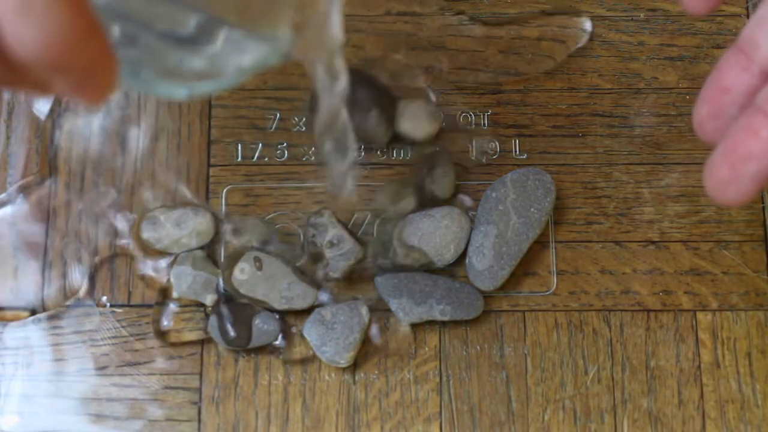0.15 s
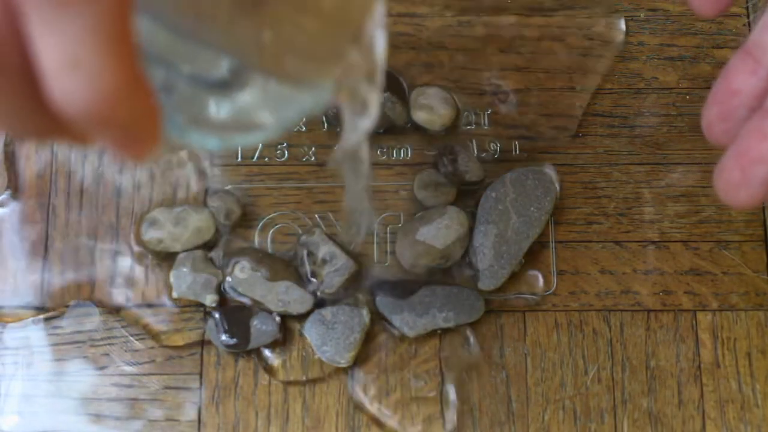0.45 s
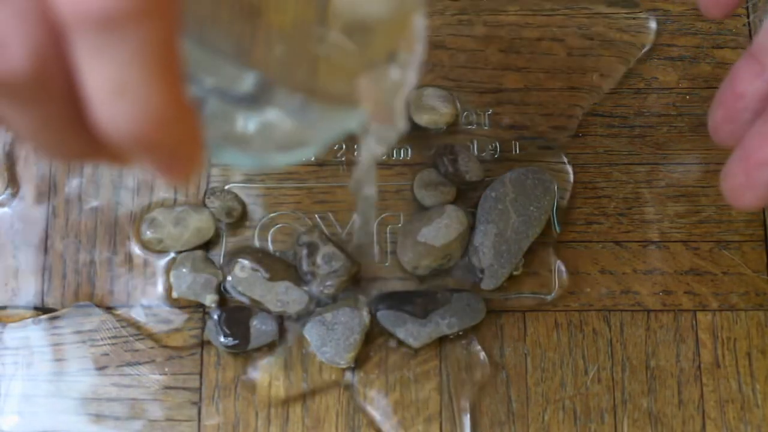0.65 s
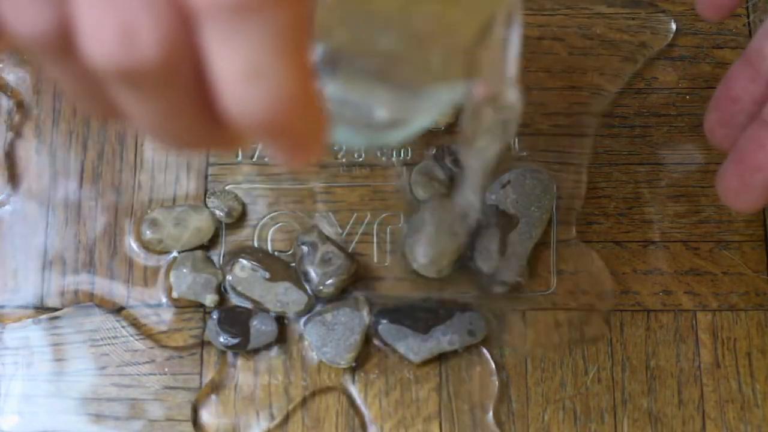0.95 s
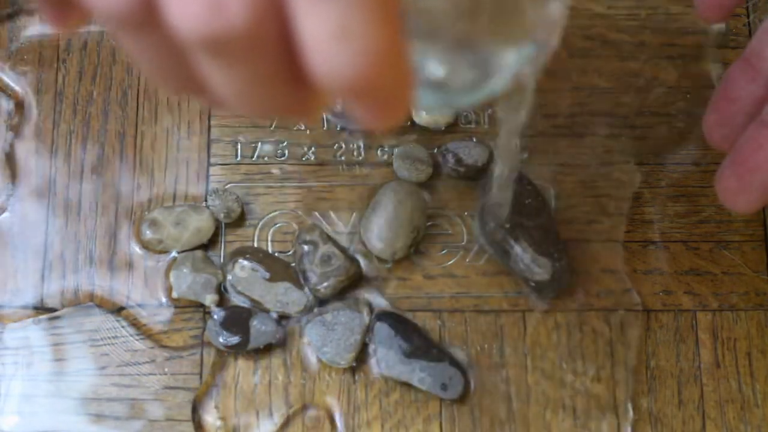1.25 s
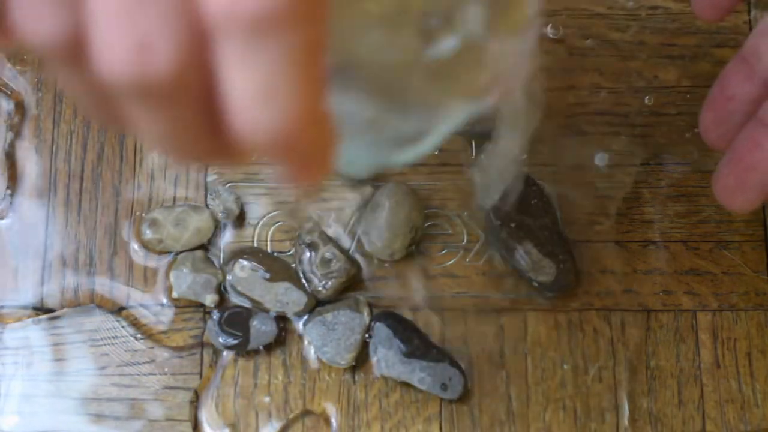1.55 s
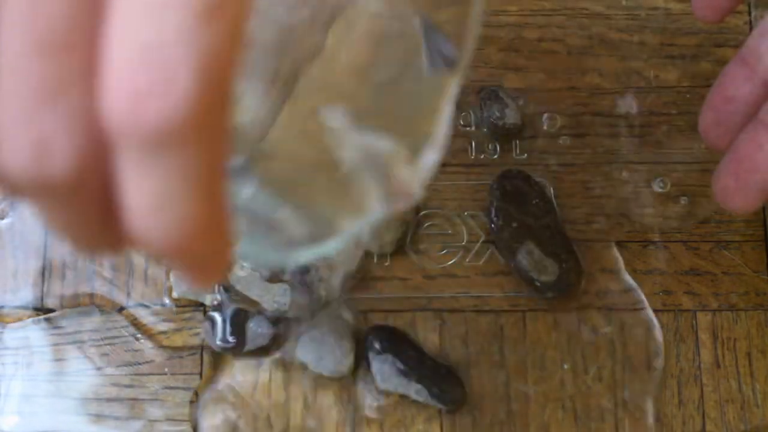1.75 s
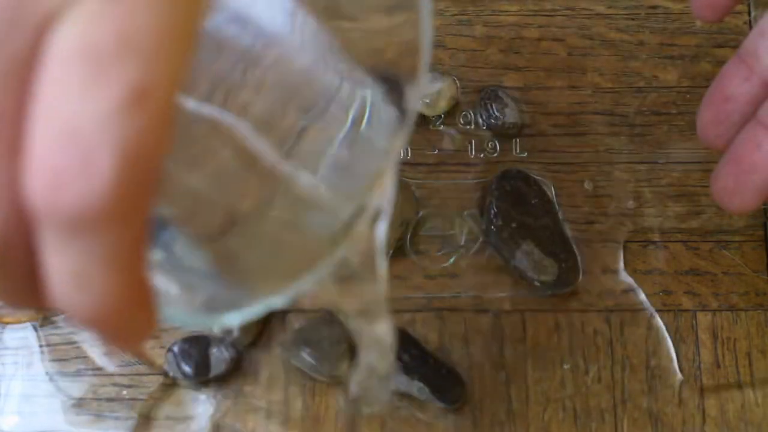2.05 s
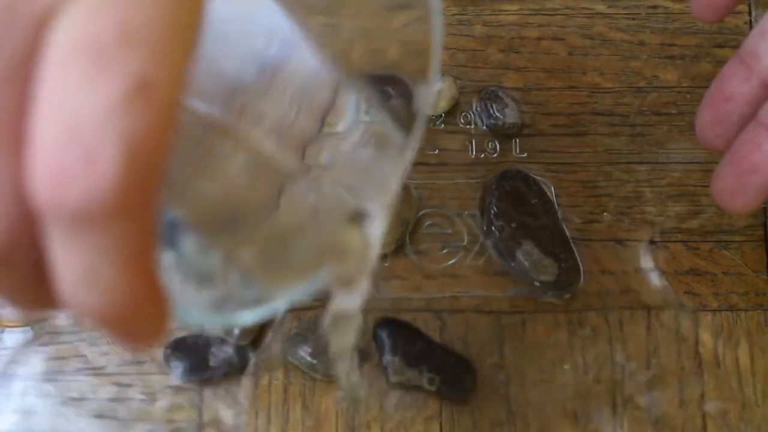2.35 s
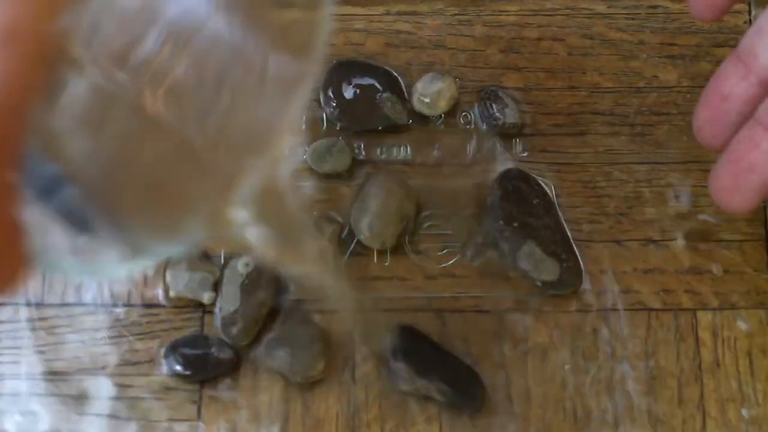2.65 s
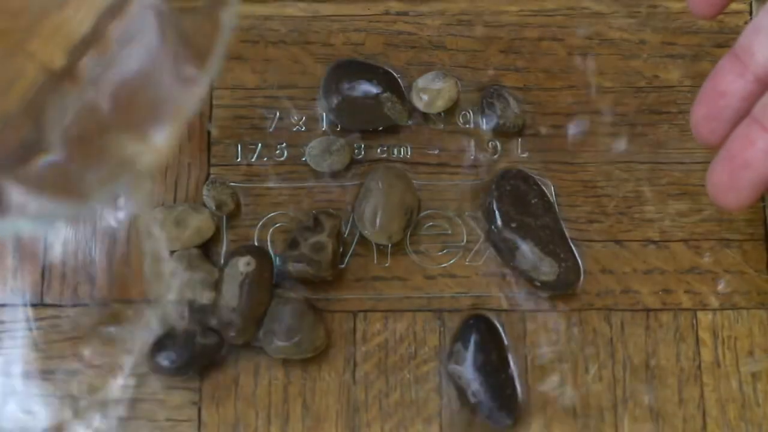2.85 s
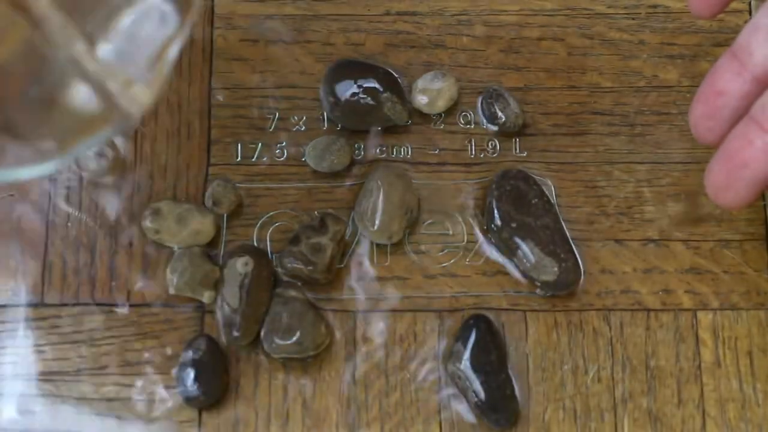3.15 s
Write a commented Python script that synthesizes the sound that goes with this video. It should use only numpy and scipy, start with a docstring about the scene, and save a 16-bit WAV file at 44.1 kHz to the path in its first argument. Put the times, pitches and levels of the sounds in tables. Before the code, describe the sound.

Water pours from a glass onto pebbles in a glass dish, pattering, spitting and bubbling close by. The pebbles roll, knock and scrape against the dish throughout, and a few drips end the pour in a quiet room.

```python
"""Water patters onto pebbles in a glass dish, poured from a glass close by; the dish is on a wooden floor.
The stream spits and traps bubbles; it rolls the pebbles, which knock, scrape and ring the dish.
A few drips end the pour, over a quiet room with a faint far motor."""
import sys
import numpy as np
from scipy import signal
from scipy.fft import rfft, irfft
from scipy.io import wavfile
from scipy.ndimage import uniform_filter1d, map_coordinates

SR = 44100
rng = np.random.default_rng(int(sys.argv[2]) if len(sys.argv) > 2 else 0)


def dump(signal):
    """Clip the signal to [-1, 1] and save it as 16-bit WAV at the path in sys.argv[1]."""
    limited = np.clip(np.atleast_2d(signal).T, -1, 1)
    pcm = np.round(limited * 32767).astype(np.int16)
    wavfile.write(sys.argv[1], SR, pcm)


N = 145530
T = np.arange(N) / SR
RING_T = T[:SR // 5]
TOP_HZ = 15750

# Flow of the stream. Each row: time in seconds, relative level in dB.
STREAM_FLOW = [(0, -50.5), (.2, -37.5), (.5, -38.5), (.62, -41.5), (.9, -47), (1.04, -46), (1.3, -47),
               (1.45, -48.5), (1.75, -35.5), (1.85, -41.5), (2.35, -46.5), (2.6, -42.5), (2.85, -42),
               (3.0, -43), (3.15, -68.5)]
# Spectrum of water on stones. Each row: frequency in Hz, relative gain in dB.
WASH_SPECTRUM = [(60, -29), (160, -14), (270, 13.5), (450, -13.5), (720, 2), (1300, 5), (2100, -1),
                 (3800, 2.5), (5500, -10.5), (9000, -10), (16000, -11)]
def stream(patter_db=3, wash_db=-2.5):
    """Falling water drums softly on the dish and washes over the stones."""
    flow = undb(curve(STREAM_FLOW))
    drops = impacts(per_s=1500, spread_db=4.5) * flow
    ring = np.zeros(N)
    for place in range(len(PLACE_STARTS_S)):
        response = dish(place, tilt_db_per_oct=-8.5, scatter_db=3)
        ring += through(drops * (place_at(T) == place), response)
    wash = unit(colour(impacts(per_s=2500, spread_db=8), WASH_SPECTRUM)) * flow
    return undb(patter_db) * waver(ring) + undb(wash_db) * wash


# Modes of the wet glass dish. Each row: frequency in Hz, t60 in seconds, then relative strength in dB
# when struck at the back, right, front, left.
DISH_MODES = [(705, 0.057, -18, -19, -19.5, -30), (801, 0.039, -16.5, -17.5, -22, -26),
              (1088.7, 0.11, -9.5, -12.5, -12.5, -16), (1882, 0.049, -3.5, 1, -0.5, -12),
              (2181, 0.029, -1, -8, -7, -13), (2911, 0.071, -7.5, -1, -8.5, 0.5),
              (3090, 0.076, -9, -2.5, 0, -24), (3158, 0.065, -4, 3, 2, -16), (3427, 0.026, -4, -5, -5, 4),
              (3893, 0.13, -8, -12.5, -29, -16), (4463, 0.077, -28, -22.5, 0, -18),
              (4604, 0.052, 1, 4.5, -3, 1.5), (4813, 0.078, -1.5, -0.5, -10.5, -1),
              (4946, 0.085, -3, 0.5, -9, -17), (5090, 0.055, 6.5, 0.5, -10, -15),
              (5530, 0.062, -23, -23, -8, 2.5), (5756, 0.12, -6.5, -3.5, -10, -8),
              (6100, 0.084, -3.5, -12, -15, -11), (6590, 0.084, -7, 1, -10.5, -3.5),
              (6750, 0.093, -13, -21, -9.5, -3), (7070, 0.043, -13, 1, -10.5, -22),
              (7250, 0.079, -12.5, -13, -13.5, -14), (7660, 0.1, -24, -5, -16, -2),
              (8114, 0.057, -6.5, 3, -12, 5), (9100, .04, -14, -3, -24, -5),
              (9500, 0.091, -30, -11, -14, -9), (10250, 0.073, -21, -4.5, -14, -2),
              (11000, 0.056, -26, -7.5, -19, -4.5), (12000, .035, -25, -11, -21, -7),
              (14000, 0.022, -26, -23, -19, -20)]
def dish(place, tilt_db_per_oct, scatter_db, detune=.003, damp_oct=.3):
    """The dish rings; each contact weights, detunes and damps its modes a little differently."""
    size, pitch, life, sign = rng.standard_normal((len(DISH_MODES), 4)).T
    hz, t60_s, *strength_db = np.array(DISH_MODES).T
    hz = hz * (1 + detune * pitch)
    t60_s = t60_s * 2 ** (damp_oct * life)
    gain = undb(strength_db[place] + scatter_db * size + tilt_db_per_oct * np.log2(hz / hz.mean()))
    modes = np.sin(2 * np.pi * hz[:, None] * RING_T) * fade(RING_T, t60_s[:, None])
    return unit_energy((gain * np.sign(sign)) @ modes)


# Times in seconds at which the stream reaches the back, right, front and left of the dish.
PLACE_STARTS_S = [0, 1.04, 1.86, 2.905]
def place_at(time_s):
    """Index of the part of the dish under the stream."""
    return np.maximum(np.searchsorted(PLACE_STARTS_S, time_s, side="right") - 1, 0)


def waver(ring, shift_s=.00005):
    """Moving water loads the glass, so its pitches drift a little."""
    drift = uniform_filter1d(rng.standard_normal(N), size=1800)
    drift = unit(uniform_filter1d(drift, size=1800))
    return map_coordinates(ring, [(T + shift_s * drift) * SR], mode="nearest")


# Strength of the spray. Each row: time in seconds, relative level in dB.
SPRAY_LEVEL = [(0, -49), (.15, -45), (.185, -30.5), (.23, -44), (.5, -39), (.7, -51), (.95, -40.5),
               (1.04, -40), (1.22, -46), (1.45, -38), (1.7, -49), (1.87, -51), (2.02, -39.5), (2.14, -52),
               (2.7, -56), (2.86, -32), (3.0, -49.5), (3.15, -64.5)]
def spray():
    """Fine spray and coarser splatter tick."""
    fine = droplets(count=520, centre_hz=11000, spread_db=8.5, t60_s=.0035)
    coarse = droplets(count=520, centre_hz=6200, spread_db=5.5, t60_s=.007)
    return (fine + undb(-1) * coarse) * undb(curve(SPRAY_LEVEL))


def droplets(count, centre_hz, spread_db, t60_s):
    """Flying droplets tick at random, a few much louder than the rest; rms 1."""
    out = np.zeros(N)
    starts_s = rng.random(count) * N / SR
    for start_s, (pitch, size) in zip(starts_s, deviates((count, 2))):
        hz = min(centre_hz * 2 ** (.3 * pitch), TOP_HZ)
        add(out, start_s, undb(spread_db * size) * spit(hz, t60_s, width_oct=.4))
    return unit(out)


# Bursting drops. Each row: start in seconds, centre in Hz, peak in dB.
DROP_BURSTS = [(0.126, 6670, -16.5), (.169, 7000, -10.5), (.171, 11100, -14.5), (.191, 7600, -12.5),
               (0.375, 10700, -23), (.512, 9000, -18.5), (0.804, 9800, -22), (.974, 7000, -19),
               (0.999, 5500, -19), (1.185, 6640, -23), (1.304, 7000, -20), (1.328, 5160, -27),
               (1.373, 12200, -21), (1.508, 7500, -17), (1.579, 4150, -15), (1.636, 5270, -15),
               (1.635, 12000, -20), (1.707, 7700, -18), (1.761, 11100, -19), (2.363, 11400, -20.5),
               (2.799, 5750, -13.5)]
def spits():
    """Single drops burst sharply."""
    out = np.zeros(N)
    for start_s, hz, db in DROP_BURSTS:
        add(out, start_s, undb(db) * spit(hz, t60_s=.008, width_oct=.25))
    return out


def spit(hz, t60_s, width_oct, swell_s=.0007):
    """A drop bursts in a short wet tick of band noise; peak 1."""
    t = T[:SR // 40]
    bins_hz = np.fft.rfftfreq(len(t), 1 / SR) + 1
    band = np.exp(-.5 * (np.log2(bins_hz / hz) / width_oct) ** 2)
    hiss = irfft(rfft(rng.standard_normal(len(t))) * band, len(t))
    tick = hiss * fade(t, t60_s) * (1 - np.exp(-t / swell_s)) ** 2
    return tick / np.abs(tick).max()


# Strength of the small bubbles. Each row: time in seconds, relative level in dB.
BURBLE_LEVEL = [(0, -58), (.2, -39.5), (.5, -39), (.62, -46), (.9, -47.5), (1.04, -51.5), (1.6, -42.5),
                (1.85, -48), (2.1, -48), (2.5, -47.5), (2.85, -41), (3.0, -45), (3.1, -64)]
def burble():
    """Small bubbles burble and fizz between the stones."""
    low = swarm(count=1100, centre_hz=2300, spread_oct=.24, cycles=22, rise=.15, spread_db=4)
    fizz = swarm(count=350, centre_hz=5200, spread_oct=.3, cycles=18, rise=.15, spread_db=5)
    return (low + undb(-7) * fizz) * undb(curve(BURBLE_LEVEL))


def trickle(peak_s=1.33, width_s=.14, level_db=-41):
    """A thin trickle runs off the big pebble: bubbles of nearly one pitch."""
    run = swarm(count=600, centre_hz=2340, spread_oct=.068, cycles=60, rise=.051, spread_db=6.5)
    return run * undb(level_db) * np.exp(-((T - peak_s) / width_s) ** 2)


def swarm(count, centre_hz, spread_oct, cycles, rise, spread_db):
    """Bubbles ring at random moments, small ones shorter than large ones; rms 1."""
    out = np.zeros(N)
    starts_s = rng.random(count) * N / SR
    for start_s, (pitch, size, life) in zip(starts_s, deviates((count, 3))):
        hz = min(centre_hz * 2 ** (spread_oct * pitch), TOP_HZ)
        t60_s = cycles * 2 ** (.5 * life) / hz
        add(out, start_s, undb(spread_db * size) * bubble(hz, t60_s, rise))
    return unit(out)


# Clear bubbles and drips. Each row: start in seconds, pitch in Hz, level in dB, t60 in seconds,
# initial rise in octaves per 10 ms.
CLEAR_BUBBLES = [(.004, 3525, -27, 0.057, 0), (.397, 3850, -22.5, 0.078, 0), (0.436, 2860, -25, .05, 0.019),
                 (.457, 1720, -23.5, .033, 0.095), (.504, 1870, -22.5, 0.074, 0.061),
                 (2.109, 1570, -22, 0.064, 0.23), (2.204, 1950, -21, 0.024, 0.36),
                 (2.268, 2230, -25, 0.014, 0.064), (2.339, 2090, -18, 0.018, 0.37),
                 (2.811, 2790, -19.5, 0.064, 0.078), (2.9, 4820, -9, .03, .03),
                 (2.96, 949, -22.5, 0.072, 0.27), (2.969, 1469, -25.5, 0.023, 0.42),
                 (3.025, 4796, -27, 0.087, 0.0048), (3.038, 1950, -26.5, 0.019, 0.32)]
def plinks():
    """Single bubbles and drips ring out."""
    out = np.zeros(N)
    for start_s, hz, db, t60_s, rise in CLEAR_BUBBLES:
        add(out, start_s, undb(db) * bubble(hz, t60_s, rise))
    return out


def bubble(hz, t60_s, rise):
    """A trapped bubble rings and rises in pitch as it nears the surface."""
    t = T[:int(np.clip(t60_s, .002, .15) * SR)]
    pitch_hz = np.minimum(hz * (1 + np.log(2) * rise * t / .01), .45 * SR)
    attack = 1 - np.exp(-t * hz / .43)
    return tone(pitch_hz) * fade(t, t60_s) * attack


# Air pockets. Each row: peak time in seconds, pitch in Hz, peak in dB, half width in seconds.
AIR_POCKETS = [(0.171, 7780, -10.5, 0.00044), (0.3124, 1516, -21.5, 0.001), (0.531, 2263, -21, 0.0038),
               (1.1445, 6140, -28, 0.0013), (1.417, 4680, -11.5, .0008), (1.582, 4540, -8, 0.00064),
               (1.675, 4680, -12, 0.0012), (1.709, 5900, -15, 0.0011), (2.812, 1734, -21.5, .003),
               (3.010, 2370, -22.5, 0.0022)]
def gulps(rise_oct_per_s=55.3):
    """Air squeezed from under the pebbles swells and dies in milliseconds while its pitch climbs."""
    out = np.zeros(N)
    for peak_s, hz, db, half_s in AIR_POCKETS:
        t = T[:int(8 * half_s * SR)] - 4 * half_s
        pitch_hz = np.minimum(hz * 2 ** (rise_oct_per_s * t), TOP_HZ)
        swell = np.cosh(2 * t / half_s) ** -.5
        add(out, peak_s - len(t) / SR / 2, undb(db) * tone(pitch_hz) * swell)
    return out


# Pebble strikes. Each row: start in seconds, relative level in dB, tilt in dB per octave.
PEBBLE_KNOCKS = [(0.0643, -18.5, -2.5), (0.0777, -15.5, -1.5), (0.209, -17, -2), (0.2235, -17, 1.5),
                 (0.2424, -23, 6), (0.2704, -14, -3.5), (0.297, -14.5, -5), (0.3125, -14.5, 0),
                 (0.3706, -16.5, -5.5), (0.393, -19.5, -0.5), (0.414, -17.5, -2.5), (0.4539, -18, -4),
                 (0.5272, -13, -2), (0.6874, -23, -6.5), (0.7695, -17, -1), (0.7895, -16, 0),
                 (0.8212, -9, -1.5), (0.8506, -9.5, -3), (0.9354, -21.5, -4), (1.032, -24, -7),
                 (1.061, -12, -2.5), (1.0803, -11, 0), (1.1005, -12, -1), (1.117, -12, 2), (1.133, -16, -2),
                 (1.1679, -12.5, -1.5), (1.3977, -8, 0.5), (1.4093, -13, -3), (1.4286, -12, 4.5),
                 (1.452, -14.5, -0.5), (1.474, -15.5, -3), (1.5397, -15.5, 0), (1.5676, -12.5, -3),
                 (1.6515, -8.5, -2.5), (1.6653, -10.5, -2), (1.8842, -20.5, -3), (1.9165, -17.5, -2.5),
                 (1.9978, -18.5, -5), (2.0291, -21.5, -4.5), (2.0825, -11, 0), (2.1259, -11, 0.5),
                 (2.149, -15.5, -2.5), (2.1862, -22, -0.5), (2.2275, -19, -0.5), (2.2601, -14, 4.5),
                 (2.2988, -9.5, 2.5), (2.3337, -6.5, 2), (2.367, -14.5, 1.5), (2.4161, -19, -3.5),
                 (2.46, -11.5, 0), (2.5406, -19, -1.5), (2.5725, -16.5, -5), (2.6414, -16.5, 1),
                 (2.7461, -15, 2.5), (2.7752, -12, 3), (2.842, -9, -3.5), (2.929, -12.5, 1)]
def knocks(gain_db=-9, rebound=.27):
    """Pebbles tip over, strike the dish and rebound a few times within milliseconds."""
    out = np.zeros(N)
    for start_s, db, tilt_db_per_oct in PEBBLE_KNOCKS:
        blows = np.zeros(SR // 80)
        blows[rng.integers(len(blows), size=6)] = rebound * rng.standard_normal(size=6)
        blows[0] = 1
        blows *= fade(T[:len(blows)], t60_s=.04)
        knock = through(contact(place_at(start_s), tilt_db_per_oct), blows)
        knock = np.sqrt(SR / 100) * unit_energy(knock)  # energy of 10 ms at rms 1
        add(out, start_s, undb(db + gain_db) * knock)
    return out


# Pebble slides. Each row: start in seconds, length in seconds, level in dB.
PEBBLE_SLIDES = [(0.774, 0.14, -31), (1.078, 0.081, -29.5), (1.399, 0.051, -22), (1.456, 0.07, -29.5),
                 (1.54, 0.068, -26.5), (1.652, 0.048, -26), (1.692, 0.073, -30), (2.412, 0.043, -25.5),
                 (2.46, 0.02, -22.5), (2.48, 0.23, -37), (2.667, 0.0276, -22), (2.70, 0.06, -38),
                 (2.734, 0.027, -24.5), (2.795, 0.076, -22.5), (2.874, 0.062, -28), (2.927, 0.03, -20)]
def scrapes(max_run_s=.015):
    """Sliding pebbles chatter in runs of tiny contacts; each run touches, and so rings, differently."""
    out = np.zeros(N)
    for start_s, length_s, db in PEBBLE_SLIDES:
        chatter = impacts(per_s=1500, spread_db=3)[:int(length_s * SR)]
        runs = np.array_split(chatter, 1 + int(length_s / max_run_s))
        for k, run in enumerate(runs):
            scrape = signal.fftconvolve(run, contact(place_at(start_s), tilt_db_per_oct=-2.54))
            scrape = np.sqrt(len(run)) * unit_energy(scrape)
            add(out, start_s + k * length_s / len(runs), undb(db) * scrape)
    return out


# Spectrum of a stone's crack before tilt. Each row: frequency in Hz, relative gain in dB.
CRACK_SPECTRUM = [(100, -27), (260, -5.5), (480, -24), (750, -14.5), (1300, -8.5), (2050, 3), (3800, -6),
                  (5000, -2.5), (7500, 2.5), (9000, -11.5), (12500, -8.5), (16000, -9.5)]
def contact(place, tilt_db_per_oct, crack_db=-9.5):
    """Stone on glass: a short dense crack and the ring of the dish."""
    spectrum = [(hz, db + tilt_db_per_oct * np.log2(hz)) for hz, db in CRACK_SPECTRUM]
    burst = rng.standard_normal(len(RING_T)) * fade(RING_T, t60_s=.05)
    crack = unit_energy(colour(burst, spectrum))
    ring = dish(place, tilt_db_per_oct, scatter_db=3.2)
    return unit_energy(ring + undb(crack_db) * crack)


def reflections(x, t60_s, db):
    """Diffuse echoes start 1 ms after the sound."""
    t = T[:SR // 2]
    echoes = rng.standard_normal(len(t)) * fade(t, t60_s) * (t > 1e-3)
    return undb(db) * through(x, unit_energy(echoes))


# Spectrum of the room noise. Each row: frequency in Hz, relative gain in dB.
ROOM_SPECTRUM = [(20, -8), (31, -14), (43, 8), (63, -13.5), (100, -4.5), (200, -1.5), (400, -10),
                 (1000, -15), (3000, -27), (8000, -28.5), (16000, -25)]
def room_noise(level_db=-46):
    """The room rumbles low and steady."""
    air = irfft(rfft(rng.standard_normal(N)) * bin_gains(ROOM_SPECTRUM, N), N)
    return undb(level_db) * unit(air)


# Hum of the far motor. Each row: time in seconds, pitch in Hz, rms level in dB.
MOTOR_HUM = [(2.3, 78, -59), (2.45, 86.23, -51), (2.6, 99.9, -50), (2.85, 100.1, -50.5),
             (3.02, 80.6, -49.5), (3.3, 76.4, -54)]
def motor():
    """A far motor speeds up and slows."""
    return np.sqrt(2) * tone(curve(MOTOR_HUM)) * undb(curve(MOTOR_HUM, column=2))


def impacts(per_s, spread_db):
    """Random train of tiny impacts of uneven size; rms 1."""
    size = undb(spread_db * deviates(N))
    hits = rng.random(N) < per_s / SR
    return unit(hits * size * rng.choice([-1, 1], N))


def colour(x, spectrum):
    """Minimum-phase filter through (Hz, dB) points."""
    cepstrum = irfft(np.log(bin_gains(spectrum, 1024)))
    half = len(cepstrum) // 2
    cepstrum[1:half] *= 2
    cepstrum[half + 1:] = 0
    return through(x, irfft(np.exp(rfft(cepstrum))))


def bin_gains(spectrum, size):
    """FFT bin gains from (Hz, dB) points."""
    hz, db = np.array(spectrum).T
    bins_hz = np.fft.rfftfreq(size, 1 / SR) + 1
    return undb(np.interp(np.log(bins_hz), np.log(hz), db))


def deviates(shape):
    """Normal draws clipped at 2 sigma."""
    return np.clip(rng.standard_normal(shape), -2, 2)


def tone(hz):
    """Sine of varying pitch."""
    return np.sin(2 * np.pi * np.cumsum(hz) / SR)


def undb(db):
    """Decibels to gain."""
    return 10 ** (np.asarray(db) / 20)


def unit(x):
    """Scale to rms 1."""
    return x / np.sqrt(np.mean(x ** 2) + 1e-20)


def unit_energy(x):
    """Scale to energy 1."""
    return x / np.sqrt(np.sum(x ** 2) + 1e-20)


def fade(t, t60_s):
    """Exponential decay."""
    return np.exp(-np.log(1000) * t / np.maximum(t60_s, 1e-4))


def curve(rows, column=1):
    """Table column interpolated over time."""
    rows = np.array(rows)
    return np.interp(T, rows[:, 0], rows[:, column])


def through(x, response):
    """Convolve and keep the length."""
    return signal.fftconvolve(x, response)[:len(x)]


def add(out, start_s, x):
    """Mix x in at start_s."""
    i = min(max(int(start_s * SR), 0), len(out))
    out[i:i + len(x)] += x[:len(out) - i]


def scene():
    """Water echoes between the dish walls; all sounds in a small room, the same in both ears."""
    water = spray() + burble() + trickle() + plinks() + gulps() + spits()
    dish_echo = reflections(water, t60_s=.05, db=-4)
    near = water + dish_echo + knocks() + scrapes() + stream()
    room_echo = reflections(near, t60_s=.4, db=-24)
    mono = near + room_echo + room_noise() + motor()
    return np.array([mono, mono])


def record(dry):
    """Steep low-pass at TOP_HZ."""
    return signal.sosfilt(signal.ellip(10, .2, 80, TOP_HZ, fs=SR, output="sos"), dry)


dry = scene()
out = record(dry)
dump(out)
```